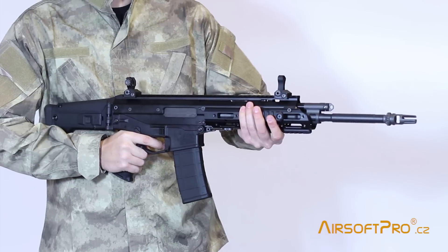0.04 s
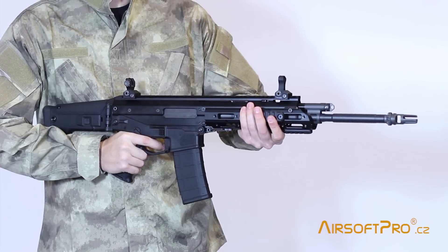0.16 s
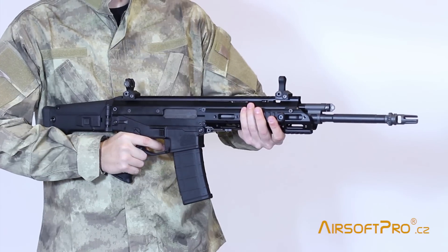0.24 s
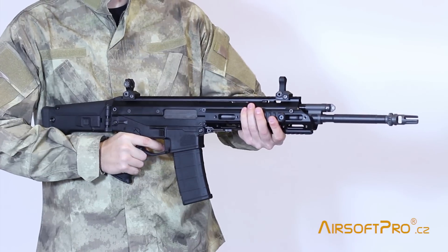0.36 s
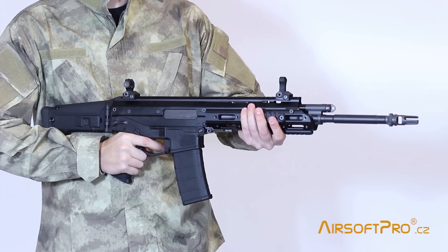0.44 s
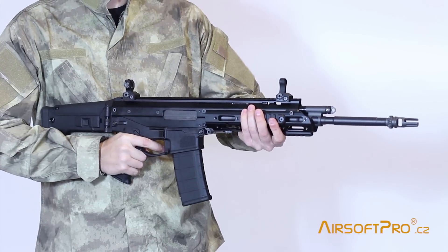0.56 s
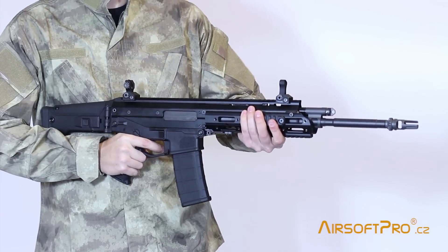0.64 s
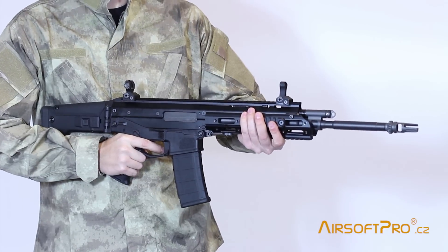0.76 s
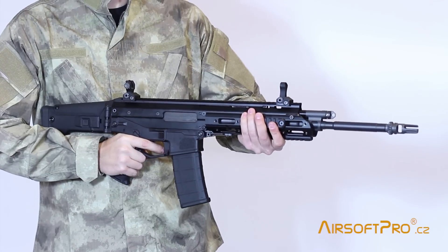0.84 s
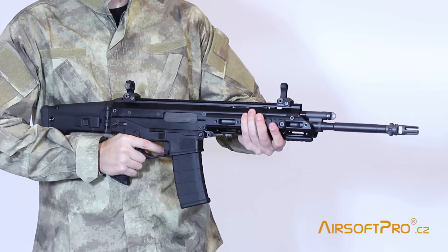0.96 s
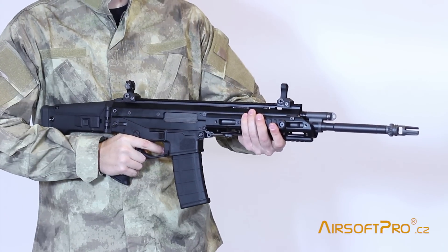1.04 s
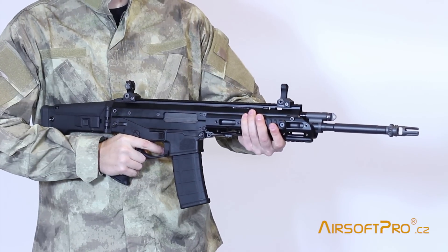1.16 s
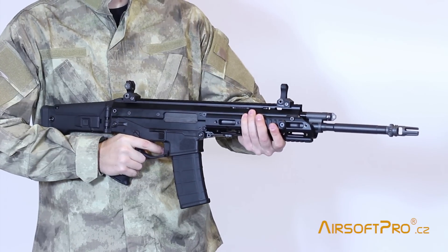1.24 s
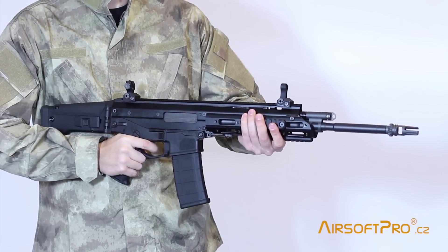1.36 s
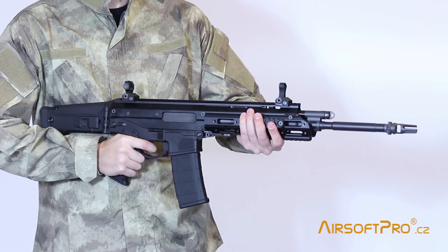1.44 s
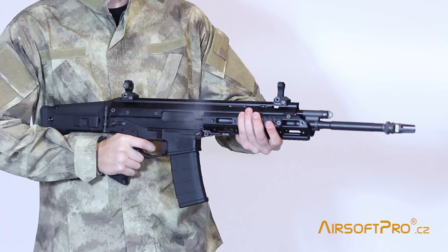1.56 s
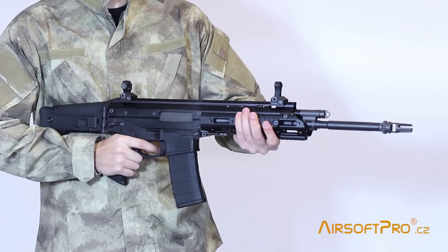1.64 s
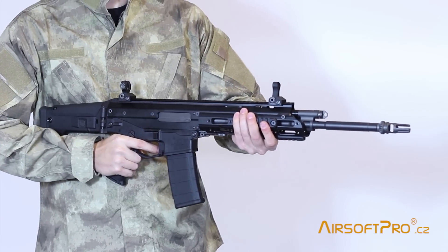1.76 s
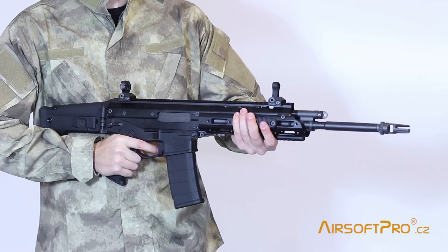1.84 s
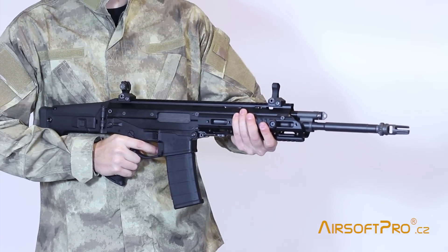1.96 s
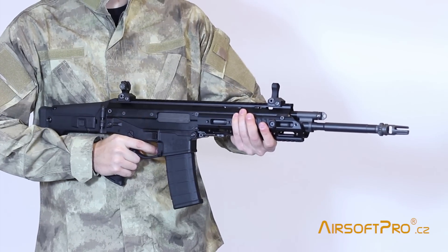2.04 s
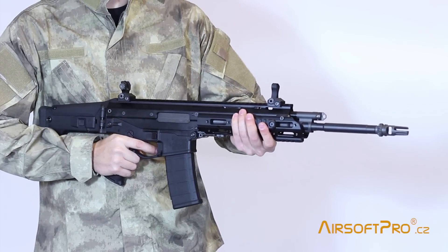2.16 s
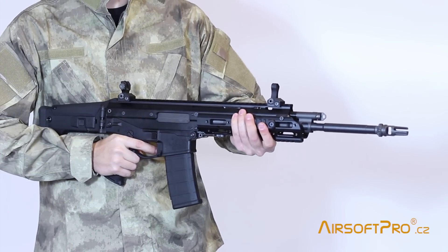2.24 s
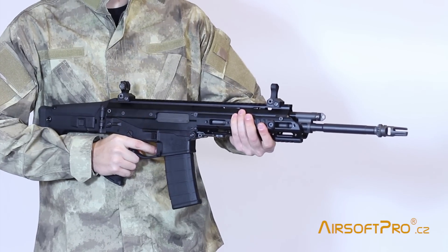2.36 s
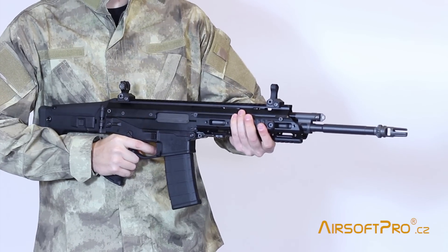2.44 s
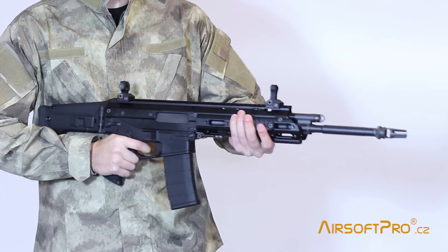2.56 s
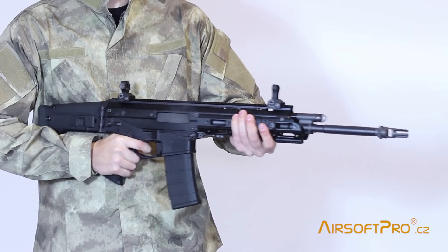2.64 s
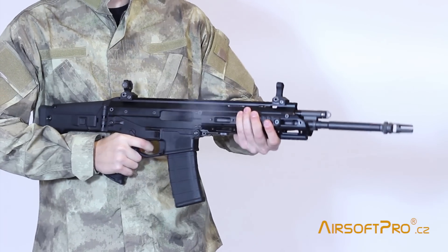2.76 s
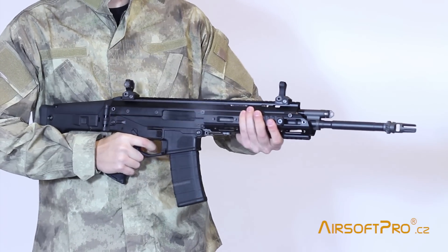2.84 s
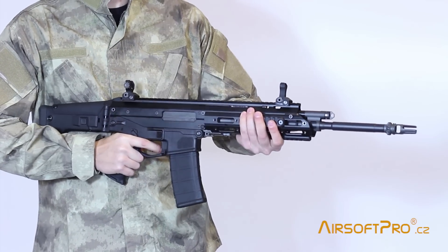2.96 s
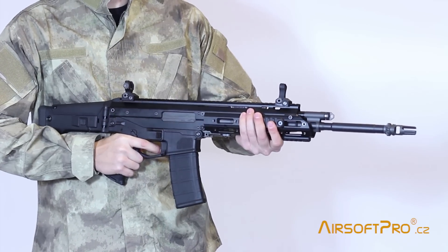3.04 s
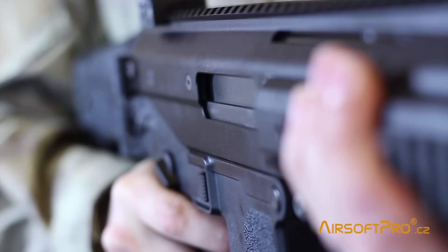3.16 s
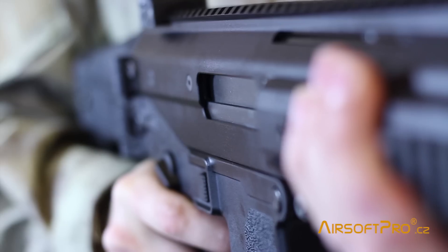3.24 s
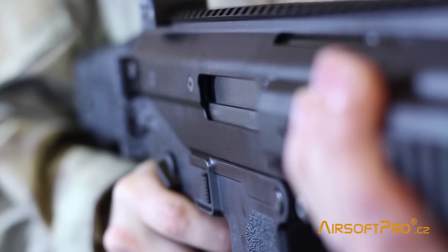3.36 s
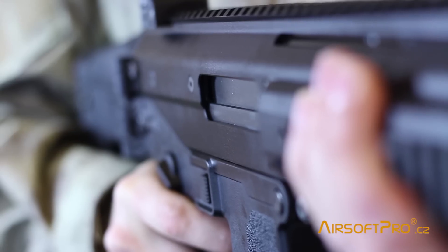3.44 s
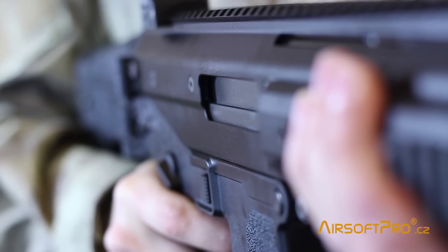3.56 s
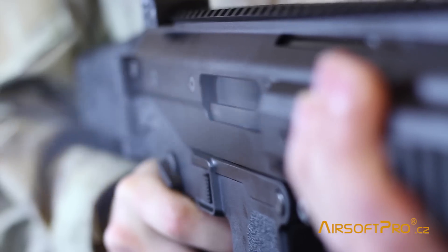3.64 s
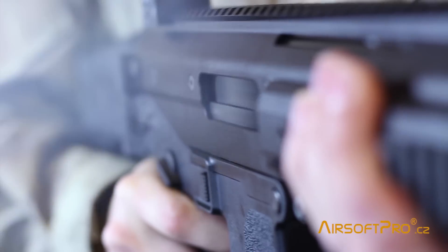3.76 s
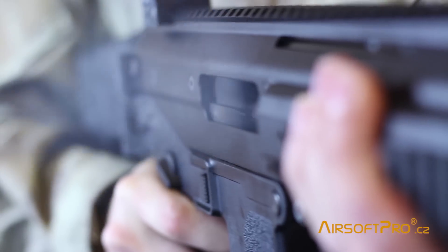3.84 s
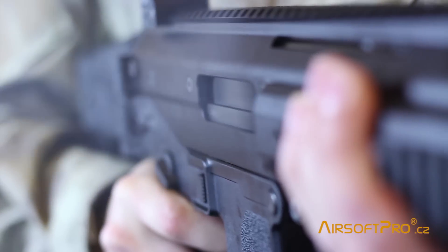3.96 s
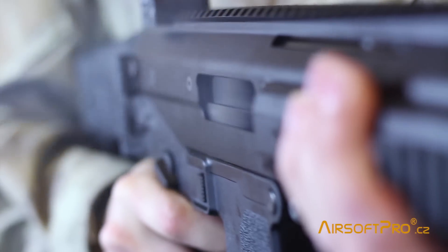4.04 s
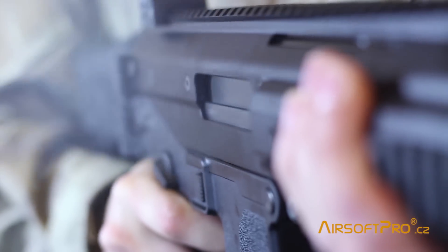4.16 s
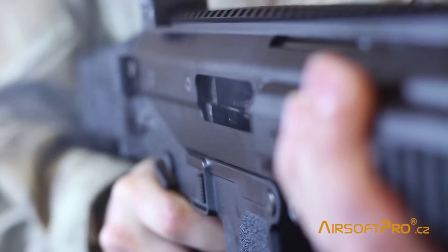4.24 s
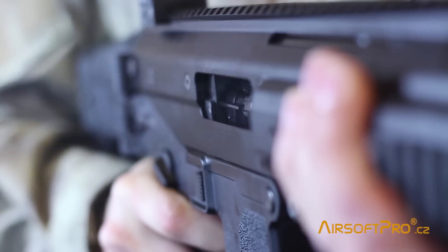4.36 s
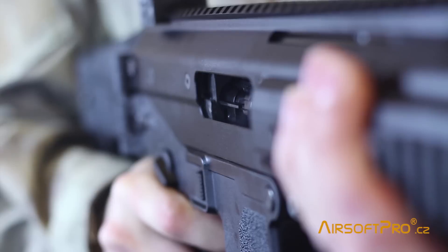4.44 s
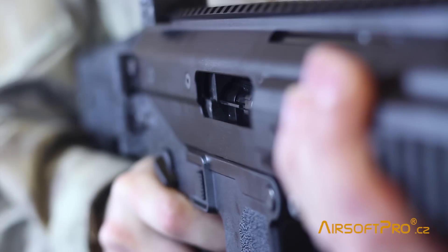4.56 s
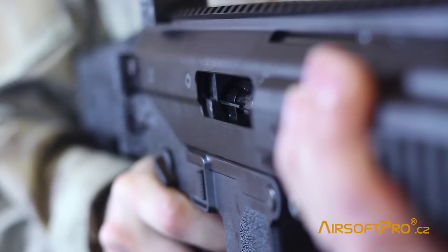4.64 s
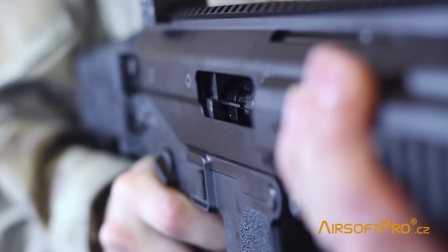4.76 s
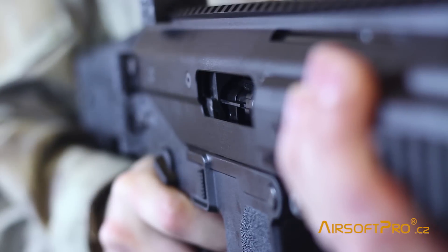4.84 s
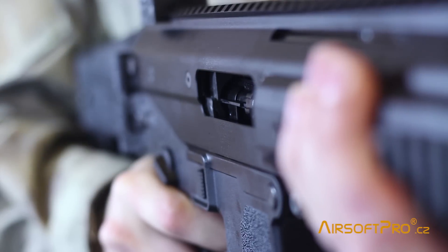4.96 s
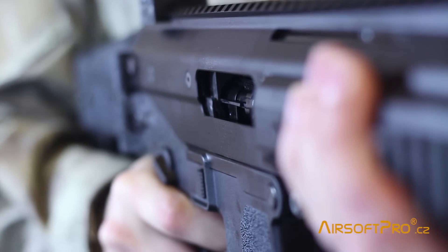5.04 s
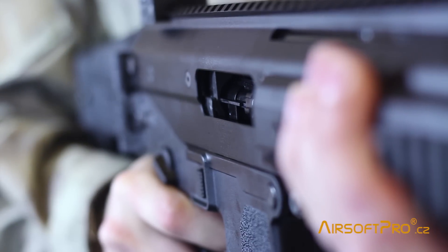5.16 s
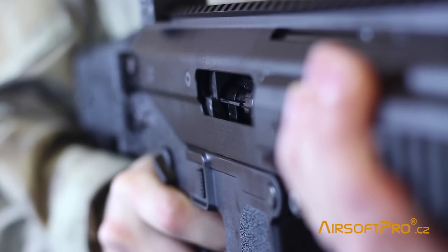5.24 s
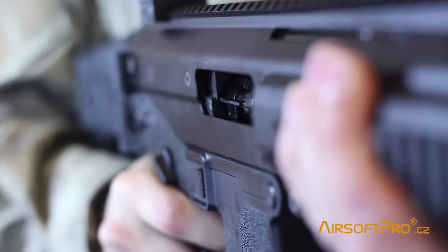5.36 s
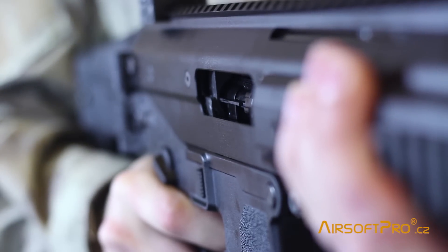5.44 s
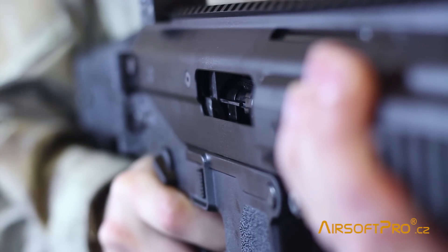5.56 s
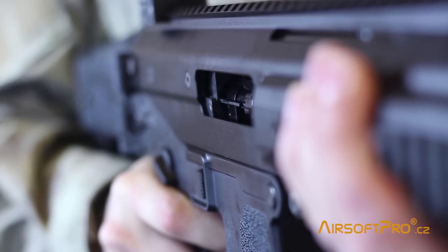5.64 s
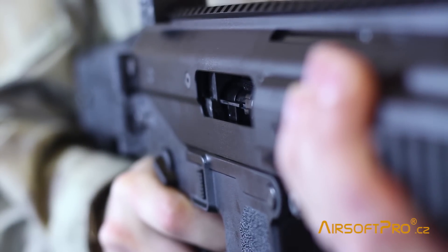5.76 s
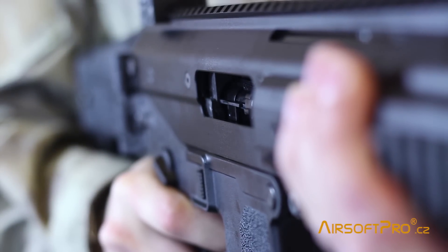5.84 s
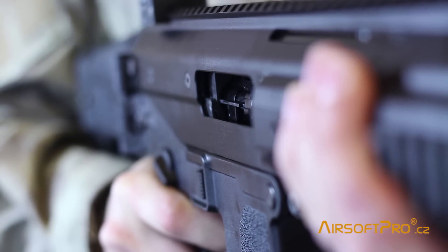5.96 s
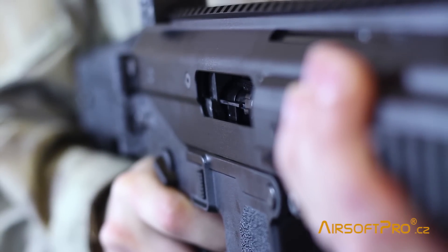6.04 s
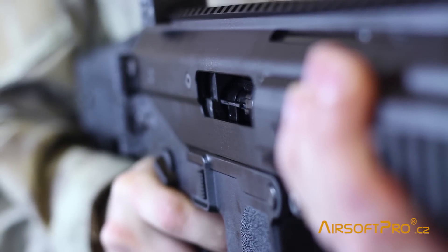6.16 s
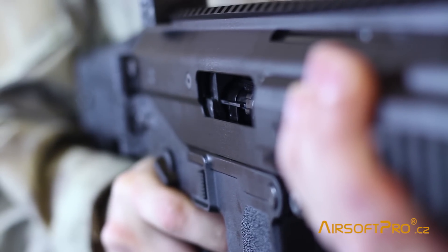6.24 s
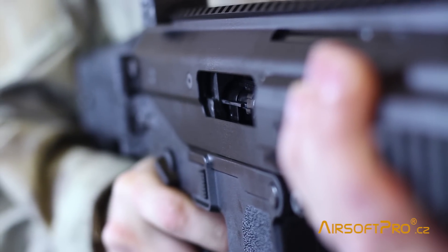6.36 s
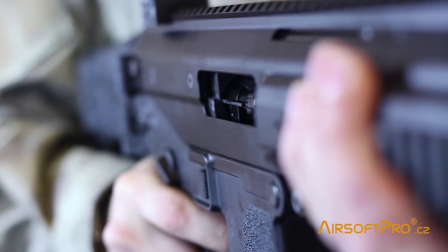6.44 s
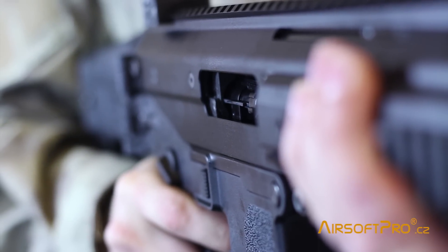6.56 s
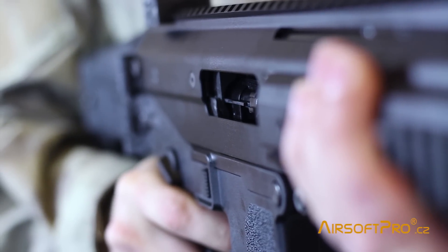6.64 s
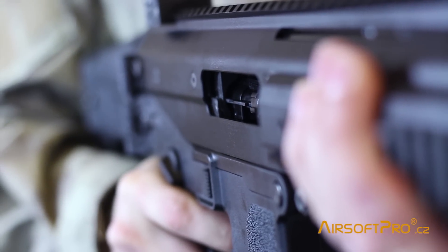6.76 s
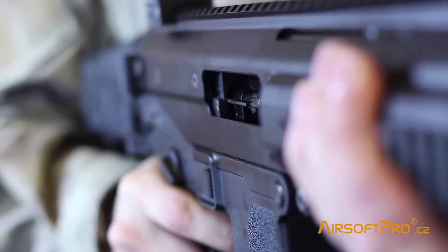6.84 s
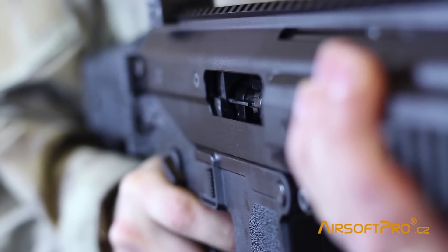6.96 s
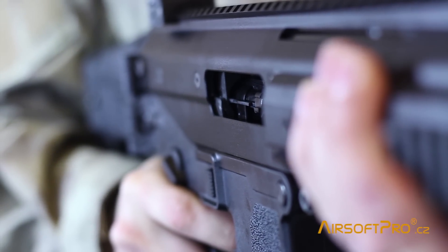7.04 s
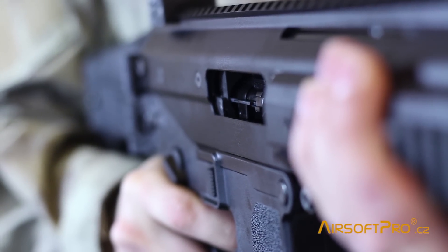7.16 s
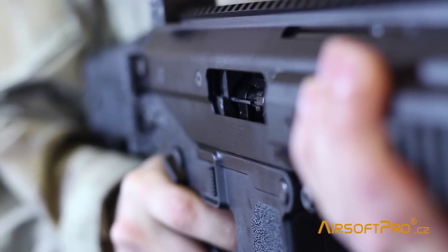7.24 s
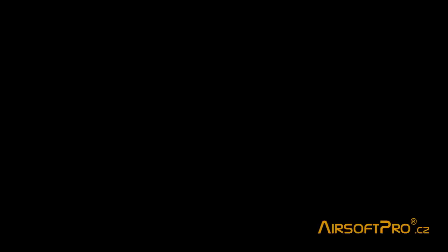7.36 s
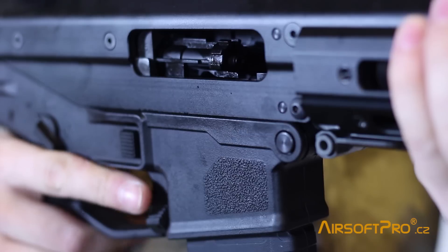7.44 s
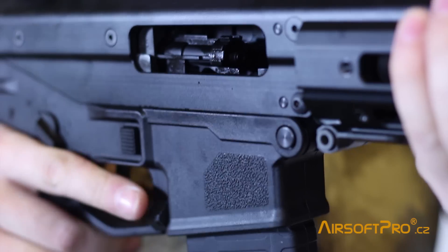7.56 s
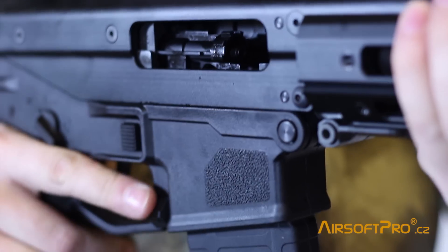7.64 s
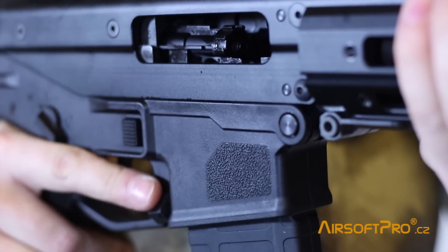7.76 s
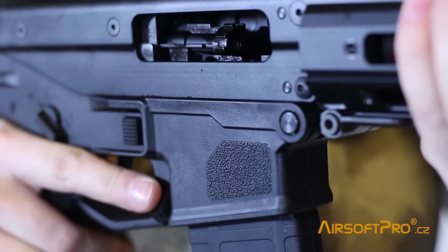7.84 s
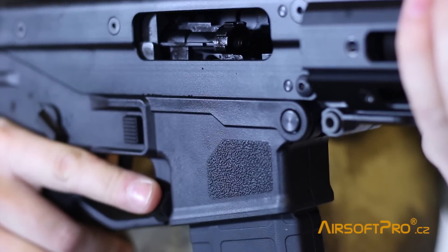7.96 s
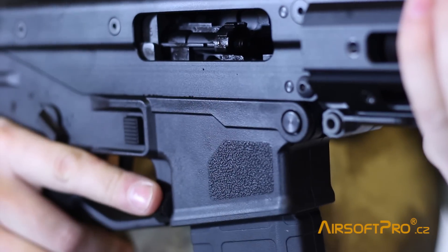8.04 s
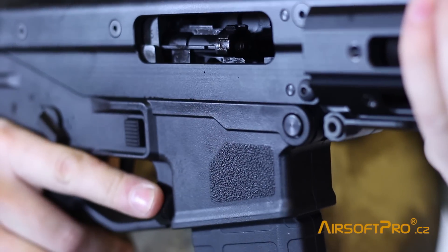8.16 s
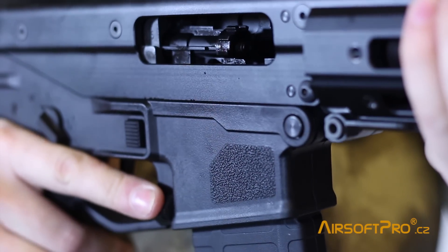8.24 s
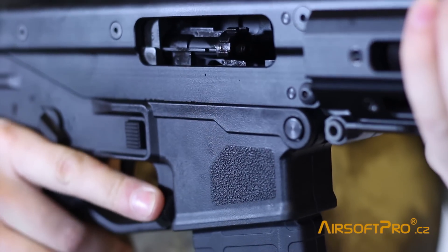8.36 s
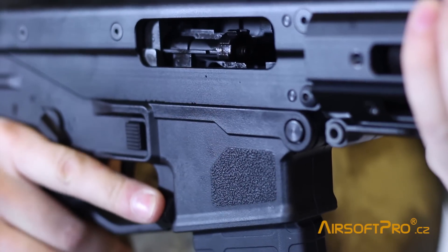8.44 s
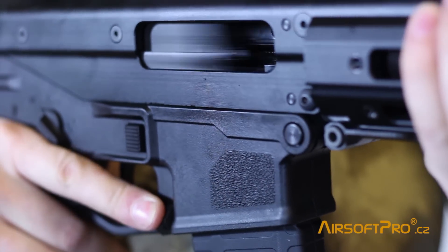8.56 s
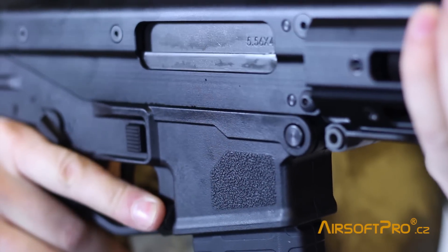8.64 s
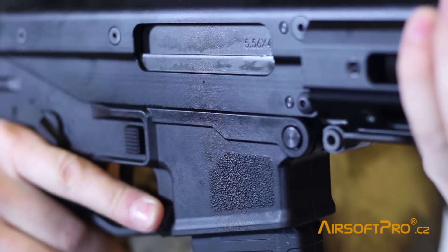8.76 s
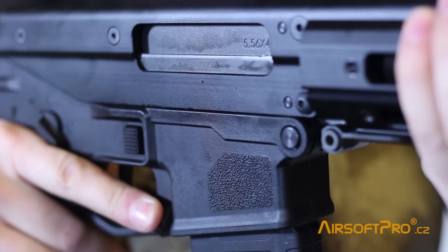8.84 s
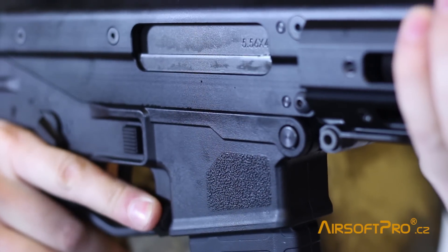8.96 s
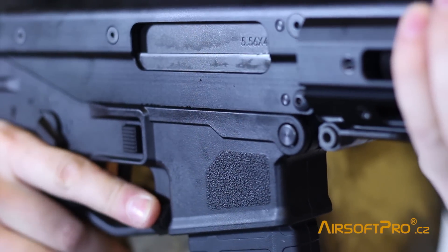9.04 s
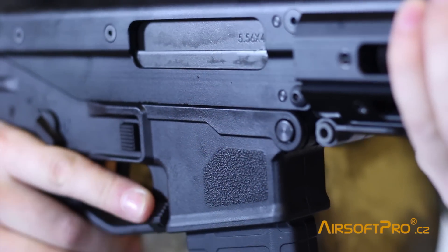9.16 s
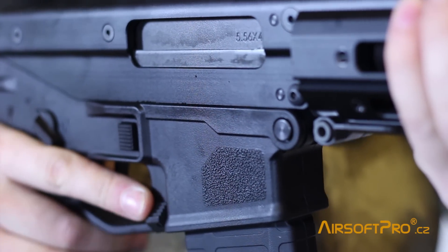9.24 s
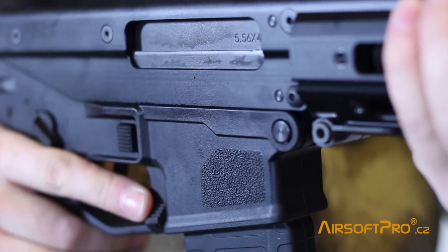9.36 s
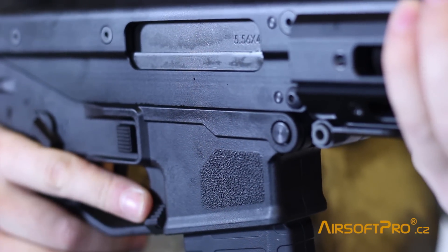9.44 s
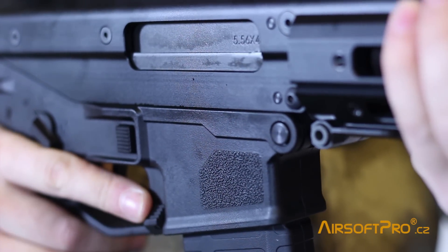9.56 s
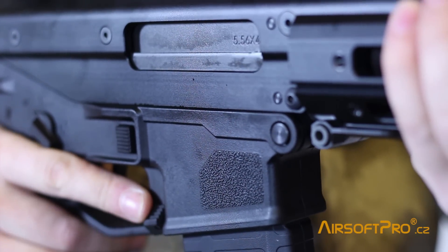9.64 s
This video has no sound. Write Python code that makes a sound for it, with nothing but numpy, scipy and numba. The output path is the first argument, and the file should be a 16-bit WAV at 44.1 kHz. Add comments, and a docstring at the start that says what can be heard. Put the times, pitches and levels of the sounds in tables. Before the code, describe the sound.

A short burst of three clattering shots, then five, then seven closer and fuller ones, with brief gas hiss and sharp whistling edges. Small pellets tap and bounce at the far end, thinning out. After near silence, fingers tick and a sleeve rustles; the bolt is released with a scrape and heavy metal clank. Small hard room, quick gain control, low hiss and faint hum.

```python
"""Three bursts of fire from a gas-driven replica rifle crack and hiss in a bare room; pellets knock about.
Later small clicks and cloth rustle lead up to the bolt being let go and slamming home.
Each blow is a brief noise that sets metal ringing; gas is shaped noise with whistles, and walls add a tail.
At a cut the tail stops and the listener moves from the rifle's side to close by; later the level dips
briefly. The microphone has fast gain control, over steady hiss and a faint hum."""
import sys
import numpy as np
from scipy import signal
from scipy.fft import rfft, irfft
from scipy.io import wavfile
from scipy.ndimage import uniform_filter1d
from numba import njit

SR = 44100
rng = np.random.default_rng(int(sys.argv[2]) if len(sys.argv) > 2 else 0)


def rack_gain(trim_db):
    """Turn a fader trim in dB into the linear factor to multiply a signal by."""
    fader = np.asarray(trim_db, float)
    return 10 ** (fader / 20)


def dump_mix(stems):
    """Bounce the given channels to the path in sys.argv[1] as a 16-bit WAV at rate SR."""
    frames = np.atleast_2d(stems).T  # one column per channel
    limited = np.clip(frames, -1, 1)  # hard clip at full scale
    pcm = np.round(limited * 32767).astype(np.int16)
    wavfile.write(sys.argv[1], SR, pcm)


N = 427769

# before this time the rifle is heard from the side, after it from close by
CUT_S = 3.207
# Rifle shots: (valve opens [s], level [dB], bolt or hammer fell this long before [ms],
# hammer cocked this long after [ms], bolt hits the buffer this long after [ms])
SHOTS = [(1.4534, 4, 3.3, 19, 28), (1.53, 12, 8.3, 9.9, 27.2), (1.6205, 12, 9.7, 11.8, 29.6),
         (2.5645, 15.5, 5.4, 28.3, 38), (2.637, 16, 8.6, 15, 29), (2.7199, 12, 11, 18.6, 27.2),
         (2.7963, 11.5, 9, 14, 39.7), (2.894, 11, 14.7, 13.9, 31.4), (3.703, 15, 4.8, 18.2, 31),
         (3.785, 11.5, 13, 19.3, 27.8), (3.87, 9, 8.2, 22.4, 32.7), (3.9699, 12.5, 13, 16.2, 28.8),
         (4.0664, 12.5, 16, 17.6, 29.1), (4.1581, 12.5, 9.9, 20, 28.4), (4.249, 13, 14.8, 20, 29.2)]
# The bolt is let go, slides and slams home:
# (time [s], mids [dB], lows relative to mids [dB], highs relative to mids [dB], contact [ms])
RELEASE = [(8.5996, -11, 6, -15.5, 7.2), (8.6099, -8.5, 3.5, 1.5, 3), (8.618, -5, 5.5, -12.5, 0.74),
           (8.6256, 6.5, -2, 0, 1.6), (8.6492, -7.5, 0.5, -14.5, 2.5), (8.6673, 11.5, -6.5, 0.5, 4.6)]
# Pellets striking and bouncing at the far end: (time [s], mids [dB], lows relative to mids [dB],
# highs relative to mids [dB], pitch of the struck spot [Hz])
KNOCKS = [(2.1972, -16.5, -14.5, -15.5, 1464), (2.2154, -18.5, -15, -20, 2300),
          (2.4235, -30, 1, -12.5, 526), (2.4301, -30.5, 0, -13.5, 900), (2.4606, -35.5, 5, -13, 1180),
          (2.514, -29.5, -2, -10.5, 1100), (3.1199, -14.5, -8, 1, 1220), (4.4314, -16, -2.5, -14.5, 1060),
          (4.4549, -18, 0.5, -6, 588), (4.5027, -22.5, 2, -10.5, 794), (4.6597, -29, -6.5, -12, 1110),
          (4.674, -33, 2, -2, 3020), (4.7226, -16.5, -1, -17.5, 720), (4.7757, -32.5, -30, -7.5, 1300),
          (4.815, -32, -1.5, -21, 610), (4.8739, -22.5, -6, -16, 900), (4.8954, -31, -24, -8, 3265),
          (4.9806, -30.5, -2, -19, 1420), (5.1044, -24, -4.5, -6, 3370), (5.1476, -24.5, -0.5, -15, 1640),
          (5.1954, -32.5, -5.5, -25, 810), (5.2848, -30.5, -12, -47, 1510), (5.3127, -22, -6.5, -19, 1830),
          (5.4168, -20, -11, -21, 1730), (5.4864, -30, -4, -16, 1800), (5.5787, -32.5, 12.5, -11.5, 516),
          (5.6297, -37.5, 6, -10.5, 470), (5.7255, -25.5, -6, -10, 596), (5.8066, -42.5, 11, -20, 500),
          (5.8587, -45, 10, -14, 700)]


def band(x, lo_hz, hi_hz, order=2):
    """Keeps only the frequencies between two limits (Butterworth band-pass)."""
    limits = [lo_hz, min(hi_hz, .45 * SR)]
    return signal.sosfilt(signal.butter(order, limits, "band", fs=SR, output="sos"), x)


def ring(x, hz, t60):
    """One mode, a decaying resonance falling 60 dB in t60 seconds; its answer to a click has unit energy."""
    r = np.exp(-np.log(1000) / (t60 * SR))
    angle = 2 * np.pi * hz / SR
    ringing = signal.lfilter([1], [1, -2 * r * np.cos(angle), r * r], x)
    return np.sqrt(2 * (1 - r * r)) * np.sin(angle) * ringing


def bursts(s, db, fade_s, size, apart):
    """Noise bursts that start fast and fade, for left and right, and a click of like energy for the walls."""
    t = np.arange(size) / SR
    fade_s = fade_s[:, None, None]
    shape = (1 - np.exp(-t / 0.00051)) * np.exp(-t / fade_s)
    noise = rng.standard_normal((len(s), 2, size)) * shape
    mid, side = noise[:, 0], noise[:, 1]
    click = (t == 0) + 0 * mid
    rows = np.stack([mid + apart * side, mid - apart * side, click], axis=1)
    # a longer contact carries more energy
    rows = rows * np.sqrt(fade_s * SR / 2 / np.sum(rows ** 2, axis=2, keepdims=True))
    out = np.zeros((len(db), 3, N + size))
    for start, row, gain in zip(s, rows, rack_gain(np.moveaxis(db, 2, 0))):
        out[..., int(start * SR):][..., :size] += gain[..., None] * row
    return out[..., :N]


def hits(rows, edges_hz, modes, ring_db, top_db, apart):
    """Each blow is a short rough contact: a crack in three ranges, and the modes in each range ring on."""
    s, db, low, high, pan, contact_ms = np.transpose(rows)
    levels = [[db + re + pan / 2, db + re - pan / 2, db + re] for re in (low, 0, high)]
    fade_s = np.abs(contact_ms) * 0.00085  # the fade constant is a little shorter than the contact
    push = bursts(s, levels, fade_s, size=1000, apart=apart)
    # a weaker crack above the three ranges, up to 12 kHz
    out = -rack_gain(top_db) * band(push[2], edges_hz[-1], 12000)
    # neighbouring ranges meet in opposite phase, so their signs alternate
    for x, lo, hi, sign in zip(push, edges_hz, edges_hz[1:], (1, -1, 1)):
        out = out + sign * band(x, lo, hi) * np.sqrt(SR / 2 / (hi - lo))
        ringing = sum(rack_gain(g) * ring(x[2], hz, t60) for hz, g, t60 in modes if lo <= hz < hi)
        out = out + rack_gain(ring_db) * ringing
    return out


def pitched(s, db, hz, t60):
    """A short contact ringing one resonance."""
    contact = bursts(np.zeros(1), [[[db]] * 3], np.array([.0012]), size=300, apart=0.18)[0, :, :4000]
    out = np.zeros((3, N))
    out[:, int(s * SR):][:, :4000] = ring(contact, hz, t60)
    return out


def blow(s, db, kind, pan_db):
    """One blow of a kind, coloured as heard from where the listener stands."""
    re, low, high, contact_ms = kind[int(s > CUT_S)]
    return s, db + re, low, high, pan_db, contact_ms


def action():
    """Lists every blow of bolt, hammer, catch and fingers on the rifle."""
    # The bolt closes once more after a burst: (time [s], level [dB])
    closings = [(1.6953, 9.5), (2.9789, 10), (4.3087, -1.5)]
    # Trigger, catch and finger ticks: (time [s], mids [dB], lows relative to mids [dB])
    small_ticks = [(3.6843, -33.5, 2), (6.2056, -58, 4), (6.245, -63, 19), (6.2828, -53.5, 7),
                   (7.641, -49, 2.5), (7.8429, -53, -12), (8.4618, -55, 5), (8.4831, -56.5, 8.5),
                   (9.1265, -48.5, 13), (9.1386, -34.5, 4.5), (9.158, -48.5, 3), (9.1846, -46, 2.5)]
    # The blows of one cycle; first row from the side, second from close by: (level relative to shot [dB],
    # lows relative to mids [dB], highs relative to mids [dB], contact [ms])
    bolt_home = [(2.5, -3, 2.5, 2.2), (0.5, -11, -5, 8.9)]
    # The valve's blow, same rows and columns
    valve = [(-4.5, 0, 5, 1.9), (-2.5, -2, 4, 4)]
    # The hammer being cocked, same rows and columns
    cocking = [(6.5, -5, 1.5, 1), (-3, 4, -4, 5.2)]
    # The bolt hitting the buffer, same rows and columns
    buffer_blow = [(-1, 6.5, -6, 2.5), (1, -3.5, -3, 4)]
    # A burst starts from rest: the hammer falls alone, same rows and columns
    first_hammer = [(-25, -6.5, -1, 5), (-13, -13, -18.5, 12)]
    # and the full valve slams, same rows and columns
    first_valve = [(4, -0.17, 2.9, 6), (9, -1.1, 5.9, 1.5)]
    pan_db = -3  # left minus right
    rows = [blow(s, db, bolt_home, pan_db) for s, db in closings]
    last = 0
    for s, db, before_ms, cock_ms, buffer_ms in SHOTS:
        rested = s - last > .3
        last = s
        rows.append(blow(s - before_ms / 1000, db, first_hammer if rested else bolt_home, pan_db))
        rows.append(blow(s, db, first_valve if rested else valve, pan_db))
        rows.append(blow(s + cock_ms / 1000, db, cocking, pan_db))
        rows.append(blow(s + buffer_ms / 1000, db, buffer_blow, pan_db))
    rows += [(s, db, low, high, pan_db, ms) for s, db, low, high, ms in RELEASE]
    # ticks have weak highs (-6.5 dB) and a 2.7 ms contact
    return rows + [(s, db, low, -6.5, pan_db, 2.7) for s, db, low in small_ticks]


def rifle_blows():
    """Cracks of the rifle's moving parts, each setting the modes of the receiver ringing."""
    # Receiver modes: (frequency [Hz], relative level [dB], time to fade 60 dB [s])
    receiver = [(1160, -4, .015), (1300, -4, .02), (1750, -1, .02), (2290, -2, .02), (2640, -6, .02),
                (3360, -8, .03), (3980, -13, .05), (5000, -14, .04), (5730, -15, .15), (5790, -15, .2),
                (7500, -9, .015), (7780, -16, .06)]
    # Edges of lows, mids and highs [Hz]
    rifle_hz = (750, 2200, 4800, 9000)
    return hits(action(), rifle_hz, receiver, ring_db=-9.5, top_db=-14.0, apart=0.51)


def flow():
    """Gas flows while the bolt runs back, sagging slowly, and is shut off after the buffer blow."""
    rise_s, sag_s, after_buffer_s, stop_s = 0.0057, 0.19, 0.0093, 0.0045
    out, t = np.zeros(N), np.arange(6000) / SR
    for s, db, before_ms, _, buffer_ms in SHOTS:
        close_by = s > CUT_S
        # from the side the hiss is heard from the bolt's fall, close by from the valve
        lead = 0 if close_by else before_ms / 1000
        shut = np.maximum(t - lead - buffer_ms / 1000 - after_buffer_s, 0)
        shape = (1 - np.exp(-t / rise_s)) * np.exp(-t / sag_s - shut / stop_s)
        gas_db = -0.5 if close_by else 3.5  # relative to the shot
        out[int((s - lead) * SR):][:len(t)] += rack_gain(db + gas_db) * shape
    return out


def gas():
    """Hiss and a dull push from the breech after each shot, as shaped noise, and the nozzle's whistle."""
    # The nozzle whistles: (time [s], level before shaping [dB], frequency [Hz], fade constant [s])
    whistles = [(1.4528, 14, 7300, .002), (2.721, 30.5, 7120, .0015), (2.727, 28.5, 7100, .0028),
                (3.7055, 30.5, 7460, .0025), (3.7835, 29.5, 7180, .003), (3.87, 27.5, 7250, 0.0025),
                (3.882, 18.5, 7200, 0.0034), (4.158, 29, 7300, .003)]
    mid, side = rng.standard_normal((2, N))
    puff = flow() * (mid + 0.21 * side * np.array([[1], [-1], [0]]))
    # gain of the push, lower from the side than close by
    push_db = np.where(np.arange(N) < CUT_S * SR, -5.5, 1.5)
    out = band(puff, 1100, 7200) + rack_gain(push_db) * band(puff, 120, 600)
    t = np.arange(2500) / SR
    aim = np.array([[1], [1], [.7]])  # the jet is aimed, so the walls get less of it
    for start, db, hz, fade_s in whistles:
        glide = hz * (t + .25 * .0012 * np.exp(-t / .0012))  # rises to pitch as the jet sets in
        swell = t / fade_s * np.exp(-t / fade_s)
        out[:, int(start * SR):][:, :len(t)] += aim * rack_gain(db) * swell * np.sin(2 * np.pi * glide)
    return out


def carrier():
    """Knock and thin ring of the steel bolt carrier as it slides home unfired."""
    # Carrier modes: (frequency [Hz], relative level [dB], time to fade 60 dB [s])
    carrier_modes = [(1190, -7, .025), (1850, -3, .025), (3359, -12, .28), (5006, -18, .25),
                     (5700, -16, .3), (5760, -13, .4), (5815, -16, .35), (7779, -12, .3)]
    s, db = np.transpose(RELEASE)[:2]
    push = bursts(s, [[db, db, db]], 0.003 + 0 * s, size=400, apart=0.29)[0]
    return rack_gain(-4.0) * sum(rack_gain(g) * ring(push, hz, t60) for hz, g, t60 in carrier_modes)


def thumps():
    """Air pushed at the microphone by the hardest blows: slow fading pressure swings, stronger on the right; a
    280 Hz swing at 3.7 s adds a short low boom to the first close shot."""
    # Swings: (time [s], level before left-right weighting [dB], frequency [Hz], fade constant [s])
    swings = [(1.452, -20.5, 60, .012), (2.562, -14.5, 50, .015), (3.699, -17, 60, .02),
              (3.7, -9.5, 280, .012), (8.667, -9.5, 45, 0.011)]
    out, t = np.zeros(N), np.arange(4000) / SR
    for start, db, hz, fade_s in swings:
        out[int(start * SR):][:len(t)] += rack_gain(db) * np.exp(-t / fade_s) * np.sin(2 * np.pi * hz * t)
    return out * np.array([[.7], [1.3]])


def bounces():
    """Lists each pellet knock and its echo off a hard surface, 11.5 ms later."""
    pan_db, contact_ms = -5.5, 2.9  # pan is left minus right
    first = np.array(KNOCKS)[:, :4]
    # the echo's changes: (delay [s], mids [dB], lows relative to mids [dB], highs relative to mids [dB])
    echo = first + (.0115, -5, -7, 8.2)
    return [(*row, pan_db, contact_ms) for row in np.vstack([first, echo])]


def pellet_blows():
    """Cracks of the pellets, each setting the modes of the backstop ringing."""
    # Backstop modes: (frequency [Hz], relative level [dB], time to fade 60 dB [s])
    backstop = [(260, 2, 0.057), (540, 1.5, .05), (720, -1, 0.011), (897.7, 3, 0.0062), (1740, -20, 0.014),
                (2500, -28, .015)]
    # Edges of lows, mids and highs [Hz]
    pellet_hz = (200, 900, 2800, 6000)
    return hits(bounces(), pellet_hz, backstop, ring_db=-9.5, top_db=-23, apart=0.16)


def spots():
    """Every knock also sounds the pitch of the spot it strikes, fading 60 dB in 28 cycles."""
    return sum(pitched(s, db + max(low, 0) - 2, hz, 28 / hz) for s, db, low, _, hz in KNOCKS)


def pings():
    """Short bright ticks nearby, each ringing at its own pitch."""
    # Small hard ticks: (time [s], level [dB], frequency [Hz])
    hard_ticks = [(4.4929, -2, 3660), (5.1158, -17.5, 3770), (5.4275, -23.5, 2500), (5.4875, -24, 2870),
                  (5.618, -23.5, 3100), (5.7368, -22, 3230), (9.1383, -42, 1750)]
    return sum(pitched(s, db, hz, t60=0.011) for s, db, hz in hard_ticks)


def rustle():
    """A sleeve moving: soft noise with a grainy level."""
    # One list for each movement: (time [s], relative level [dB])
    moves = [
        [(6.15, -95), (6.3, -73), (6.7, -75)],
        [(7.46, -70), (7.55, -61), (7.68, -60), (7.85, -68), (8.0, -77)],
        [(8.35, -74.5), (8.5, -72), (8.59, -68.5)],
        [(9.14, -76.5), (9.26, -58), (9.4, -73.5)],
    ]
    t = np.arange(N) / SR
    gain = sum(rack_gain(np.interp(t, *np.transpose(rows), left=-120, right=-120)) for rows in moves)
    grain = rack_gain(32 * uniform_filter1d(rng.standard_normal(N), size=300))
    # part of the noise is shared by both channels
    noise = rng.standard_normal((2, N)) + 0.83 * rng.standard_normal(N)
    return gain * grain * 2.5 * band(noise, 500, 5200, order=1)


def room():
    """Reflections, each range fading at its own rate; the early ones are uneven, the late ones dense."""
    # Room: (frequency [Hz], time to fade 60 dB [s], relative level [dB], likeness of left and right [0-1])
    ranges = [(115, 0.26, -6, 0.7), (314, 0.43, 3.5, 0.99), (650, 0.51, -1.5, 0.6), (1510, 0.39, 3, 0.8),
              (2960, 0.45, 1, 0.51), (6000, 0.33, 3, 1), (11000, 0.11, -13.5, 0.3)]
    t = np.arange(36000) / SR
    lumps = uniform_filter1d(rng.standard_normal(len(t)), size=100) * 10
    uneven = rack_gain(4 * lumps * np.exp(-t / .035))
    answer = 0
    for hz, t60, db, alike in ranges:
        mid, side = band(rng.standard_normal((2, len(t))), hz / 1.445, hz * 1.43)
        pair = mid * np.sqrt(1 + alike) + side * np.sqrt(1 - alike) * np.array([[1], [-1]])
        answer = answer + rack_gain(db) * pair * np.exp(-np.log(1000) * t / t60)
    return answer * (1 - np.exp(-t / 0.0058)) * uneven * rack_gain(-35.5)


def colour(points, db):
    """Steady noise whose spectrum follows (frequency [Hz], level [dB]) points, set to an overall level."""
    hz, shape = np.transpose(points)
    f = np.fft.rfftfreq(N, 1 / SR)
    weight = rack_gain(np.interp(np.log(f + 1), np.log(hz), shape))
    x = irfft(rfft(rng.standard_normal(N)) * weight, N)
    return x * rack_gain(db) / x.std()


def floor():
    """Microphone hiss, stronger in the difference of the channels, and a faint hum of steady tones."""
    # Hiss common to both channels: (frequency [Hz], relative level per Hz [dB])
    hiss_mid = [(12, -42.5), (20, -8.5), (223, -5.5), (249, -9), (302, -4), (328, -10), (408, -9),
                (766, -12.5), (832, -11), (11200, -22.5), (14000, -33)]
    # Hiss opposite in the two channels: (frequency [Hz], relative level per Hz [dB])
    hiss_side = [(12, -42.5), (20, -20), (140, -4.5), (419, -3.5), (551, -10.5), (787, -5), (855, -7.5),
                 (1220, -8.5), (5990, -16.5), (12900, -25), (14000, -37)]
    # Hum tones: (frequency [Hz], level [dB])
    hum_tones = [(102.3, -72), (220.7, -81), (301.5, -79.5), (414.5, -87.5)]
    t = np.arange(N) / SR
    hum = sum(rack_gain(db) * np.sqrt(2) * np.sin(2 * np.pi * hz * t) for hz, db in hum_tones)
    return colour(hiss_mid, -60) + hum + colour(hiss_side, -56.5) * np.array([[1], [-1]])


def scene():
    """Mixes rifle, pellets, walls and background; the cut chops the tail, and later the level dips briefly."""
    t = np.arange(N) / SR
    rifle = rifle_blows() + gas() + carrier()
    pellets = pellet_blows() + spots()
    first = t < CUT_S
    # less of the rifle goes to the walls after the cut
    sent = rifle[2] * rack_gain(np.where(first, -4, -7)) + rack_gain(3.0) * pellets[2]
    walls, cut = room(), first.sum()
    # each part rings on its own, so no tail crosses the cut
    parts = (sent[:cut], sent[cut:])
    tail = np.hstack([signal.oaconvolve(part[None], walls, axes=1)[:, :len(part)] for part in parts])
    # direct sound is silent for 0.4 s after the cut
    near = (rifle + pellets + pings())[:2] * (first | (t > CUT_S + .4))
    # little bass carries from such small parts
    sound = signal.sosfilt(signal.butter(3, 110, "high", fs=SR, output="sos"), near + tail)
    dip = np.where((t > 7.412) & (t < 7.443), rack_gain(-41.5), 1)
    return (sound + thumps() + rustle() + floor()) * dip


@njit
def follow(x, top, attack, release, slope, cut):
    """Gain from a peak follower that rises fast and falls slowly; it starts afresh at the cut."""
    gain, e = np.ones(len(x)), 0.
    for i in range(len(x)):
        if i == cut:
            e = 0.
        else:
            e += (x[i] - e) * (attack if x[i] > e else release)
        if e > top:
            gain[i] = (top / e) ** slope
    return gain


def low_pass(x):
    """Removes everything above the highest recorded frequency."""
    return signal.sosfilt(signal.butter(12, 15950, fs=SR, output="sos"), x)


def record(dry):
    """Gain control holds the tails level after each burst; the first blows get through and clip."""
    loud = uniform_filter1d(np.abs(dry).max(axis=0), size=90)
    attack_s, release_s = 0.011, 0.032
    gain = follow(loud, rack_gain(-22), 1 / (attack_s * SR), 1 / (release_s * SR), 0.88, int(CUT_S * SR))
    return low_pass(np.clip(dry * gain, -1, 1))


dry = scene()
out = record(dry)
dump_mix(out)
```